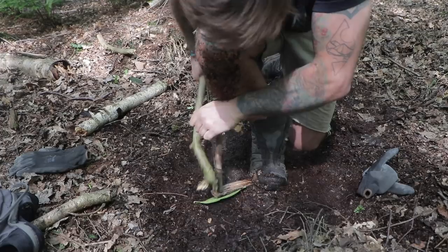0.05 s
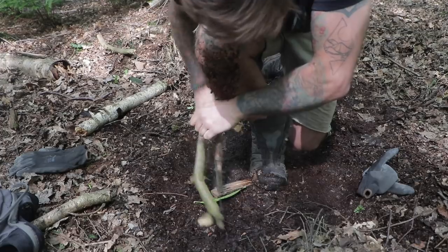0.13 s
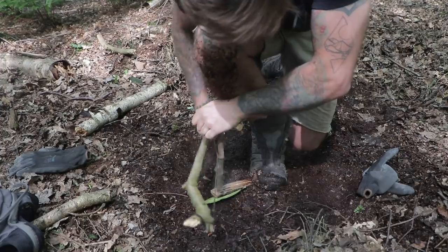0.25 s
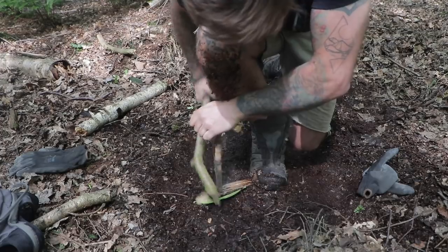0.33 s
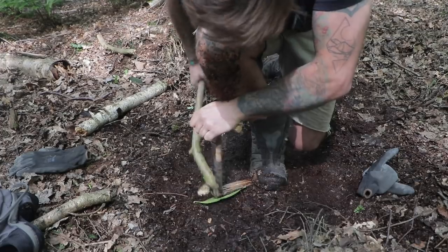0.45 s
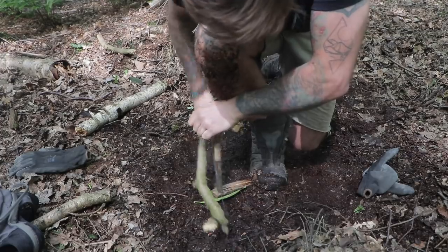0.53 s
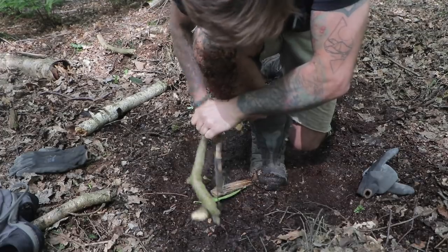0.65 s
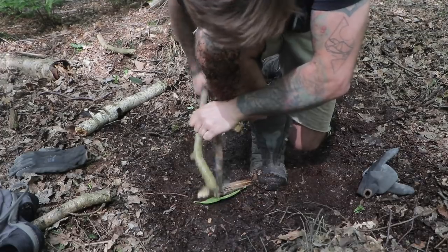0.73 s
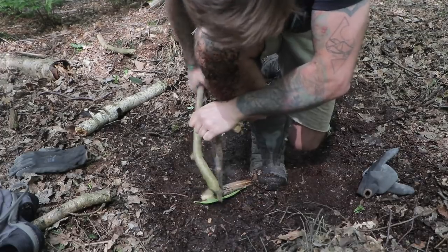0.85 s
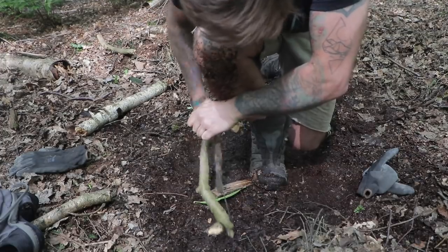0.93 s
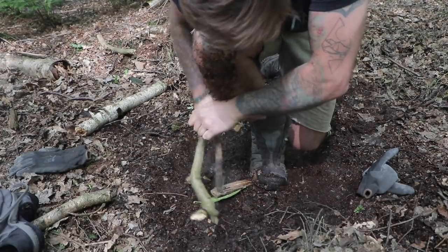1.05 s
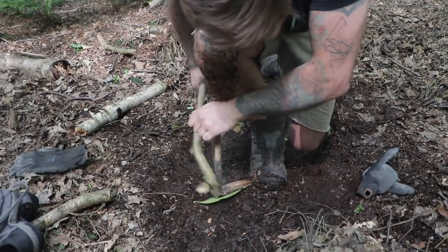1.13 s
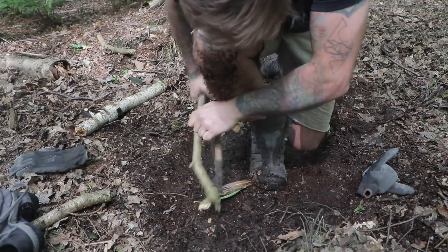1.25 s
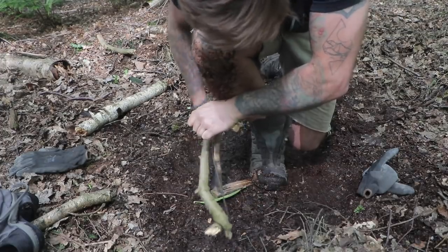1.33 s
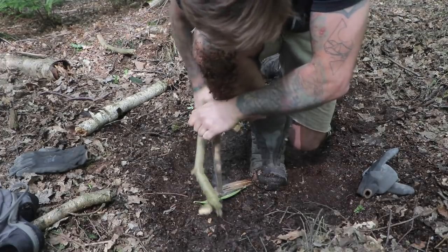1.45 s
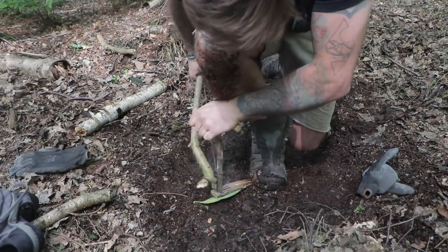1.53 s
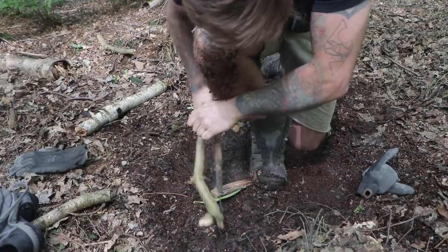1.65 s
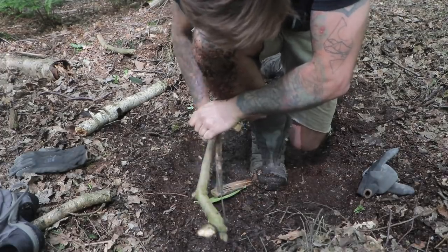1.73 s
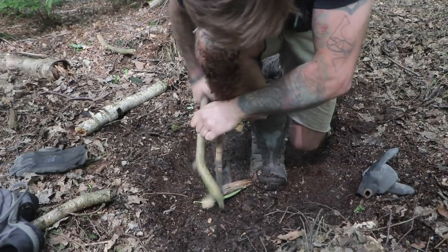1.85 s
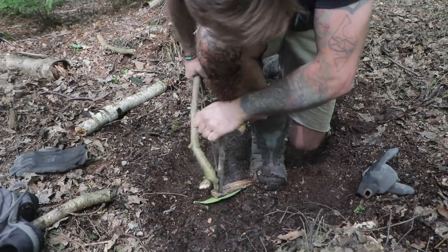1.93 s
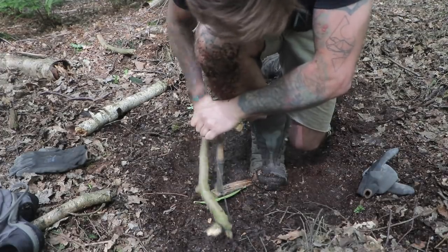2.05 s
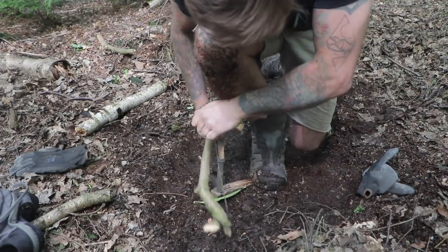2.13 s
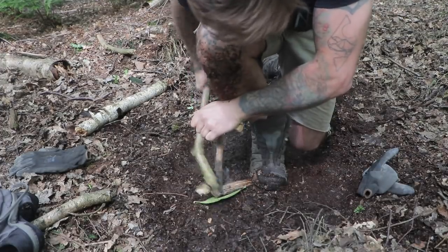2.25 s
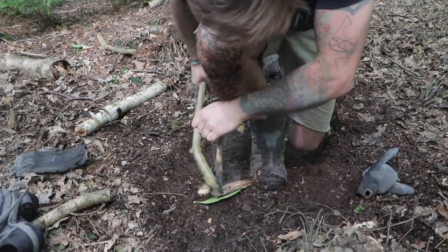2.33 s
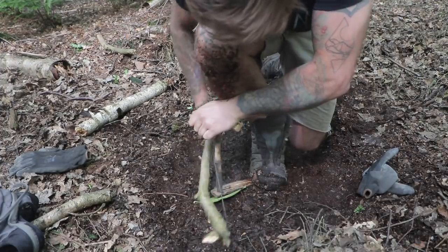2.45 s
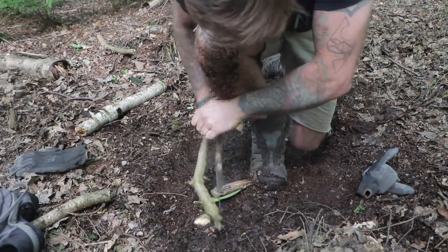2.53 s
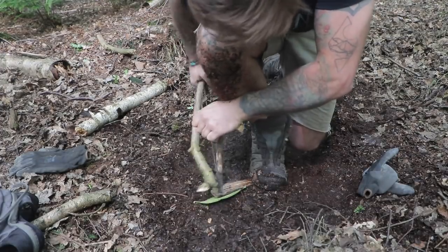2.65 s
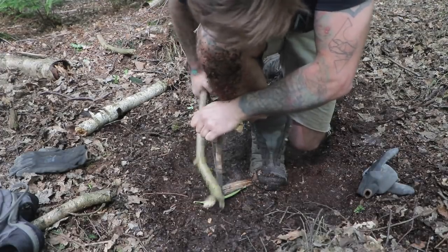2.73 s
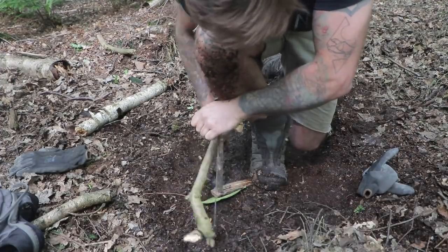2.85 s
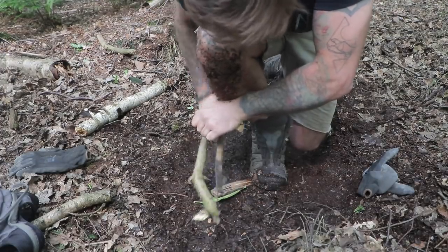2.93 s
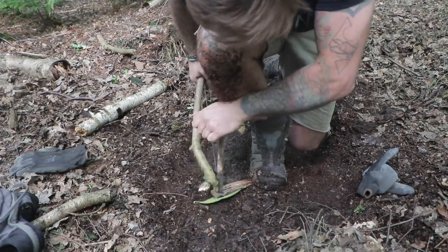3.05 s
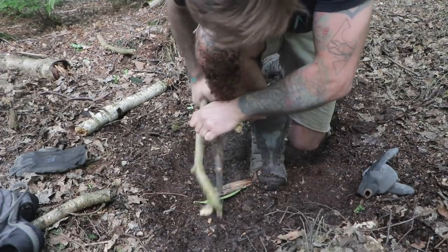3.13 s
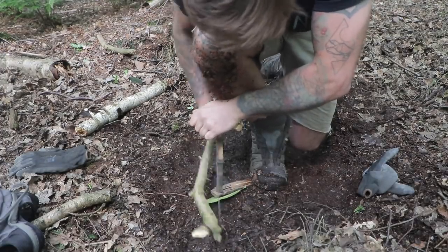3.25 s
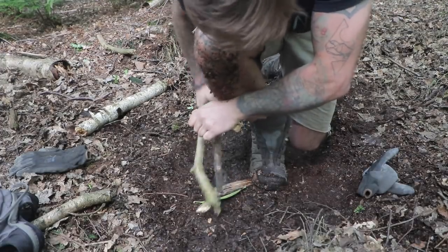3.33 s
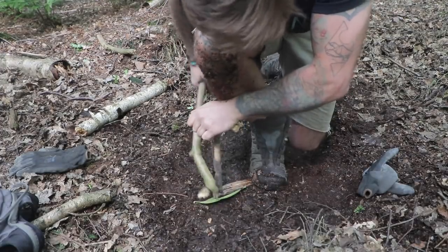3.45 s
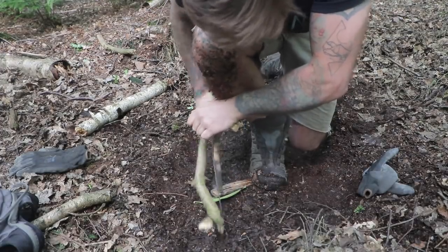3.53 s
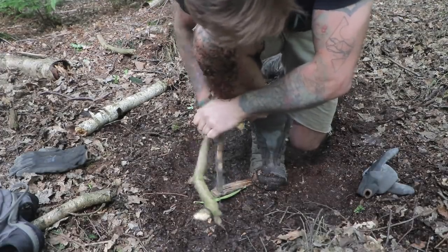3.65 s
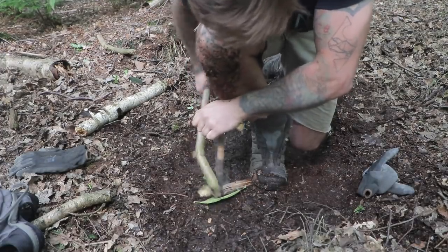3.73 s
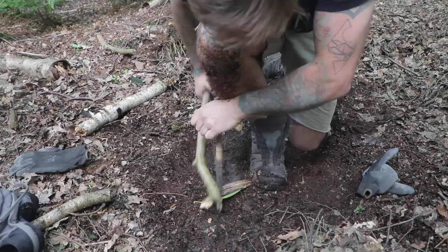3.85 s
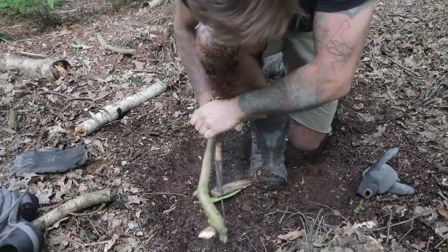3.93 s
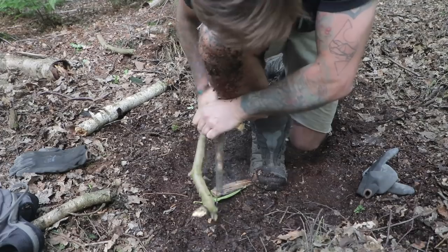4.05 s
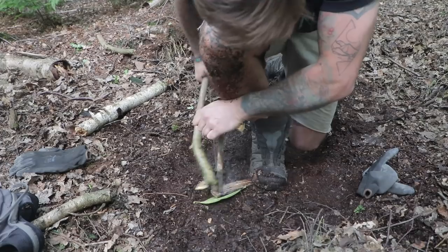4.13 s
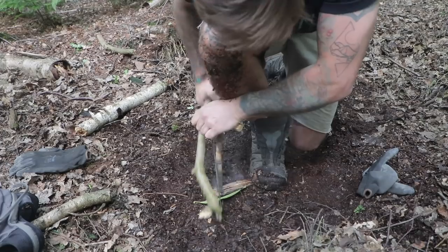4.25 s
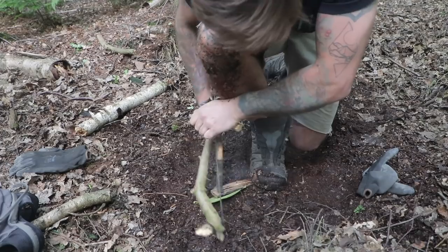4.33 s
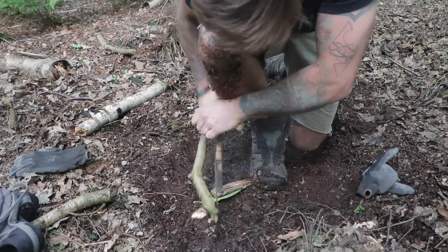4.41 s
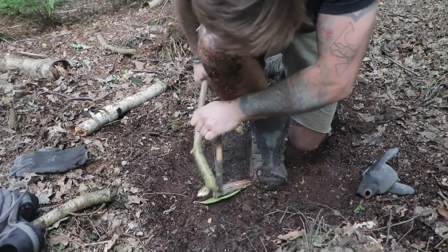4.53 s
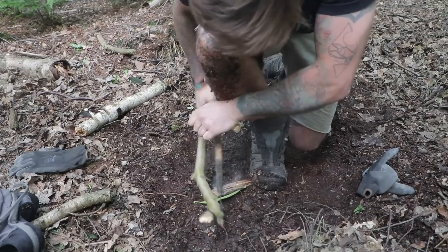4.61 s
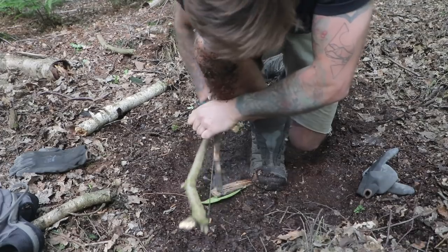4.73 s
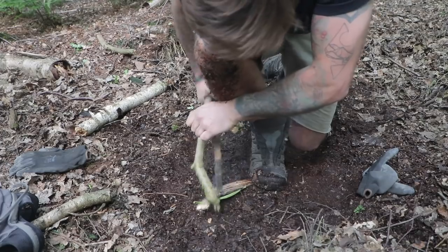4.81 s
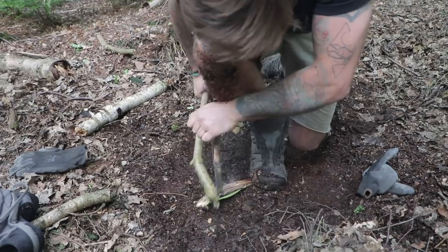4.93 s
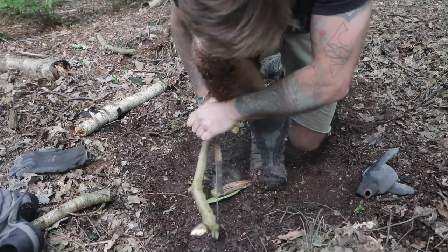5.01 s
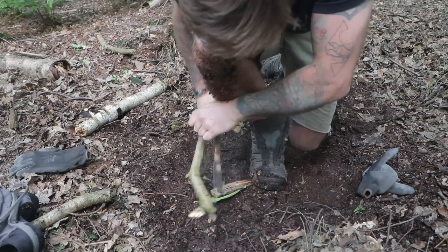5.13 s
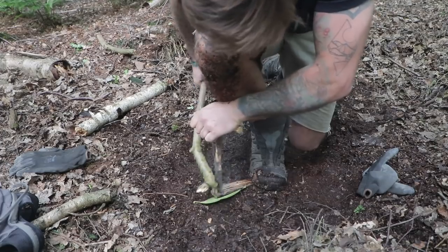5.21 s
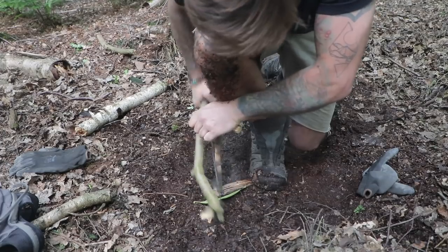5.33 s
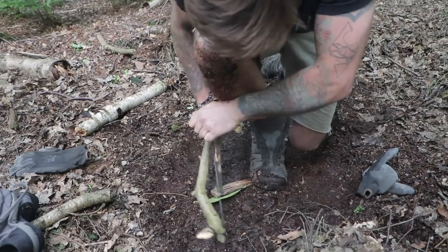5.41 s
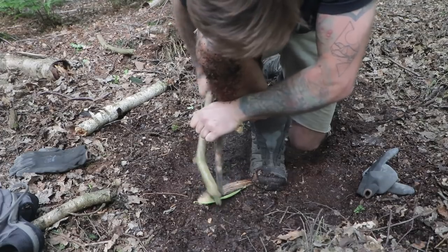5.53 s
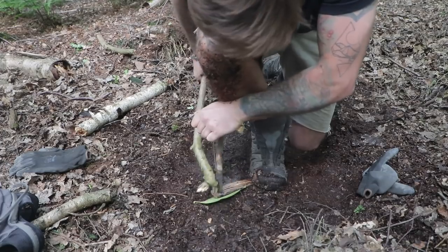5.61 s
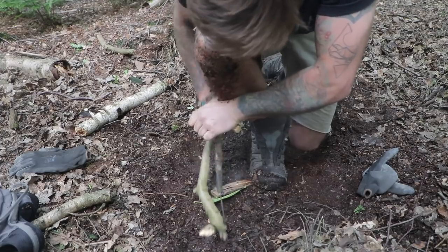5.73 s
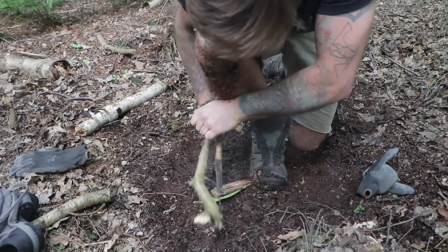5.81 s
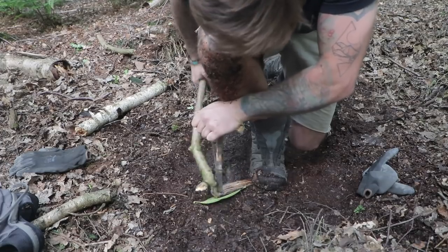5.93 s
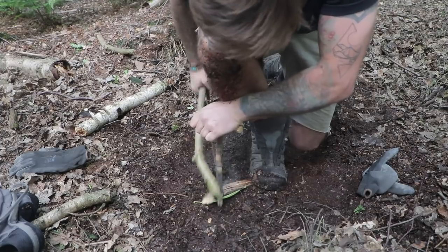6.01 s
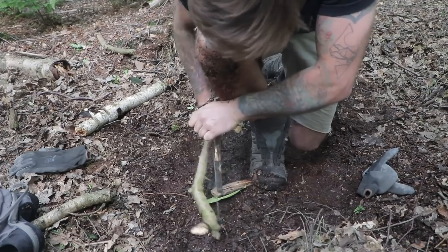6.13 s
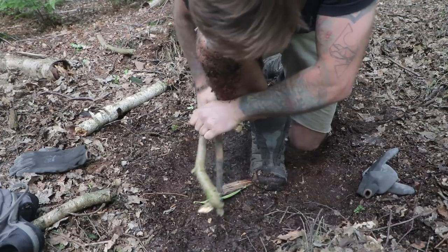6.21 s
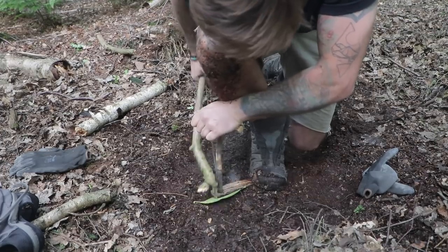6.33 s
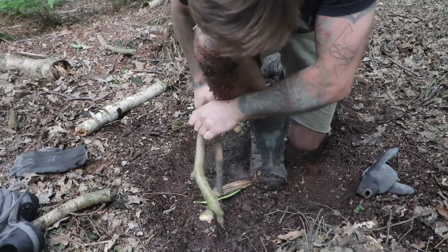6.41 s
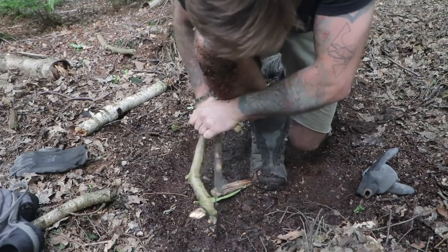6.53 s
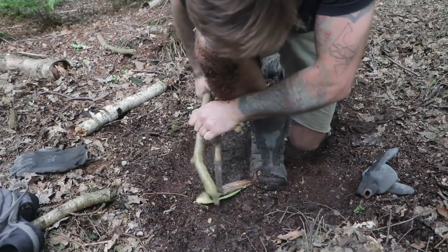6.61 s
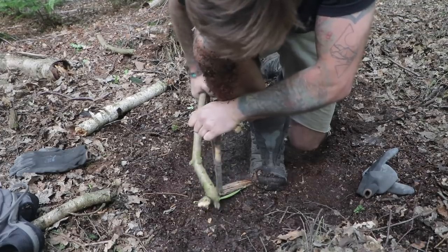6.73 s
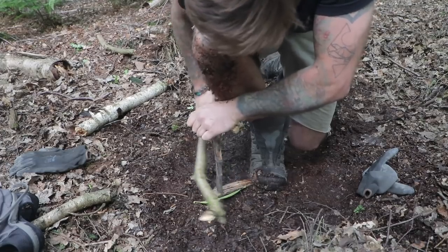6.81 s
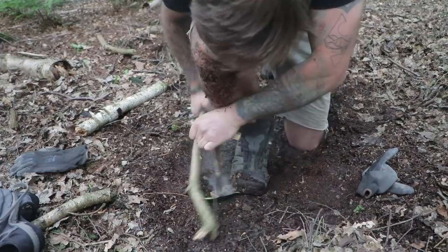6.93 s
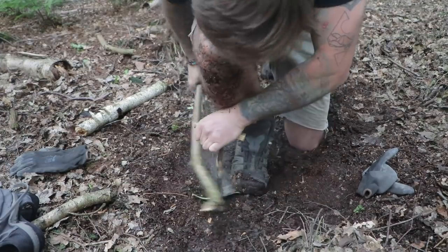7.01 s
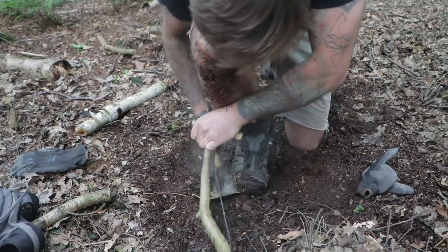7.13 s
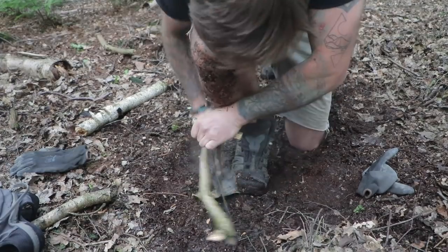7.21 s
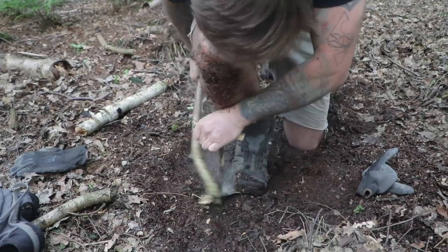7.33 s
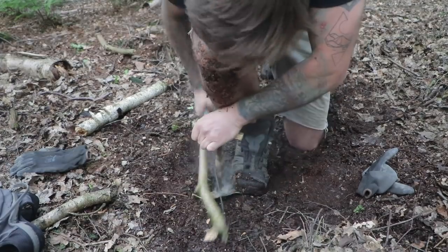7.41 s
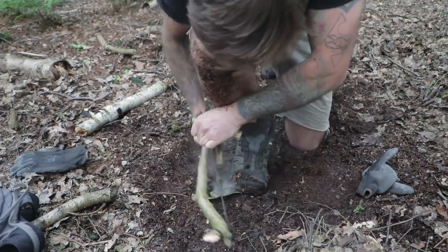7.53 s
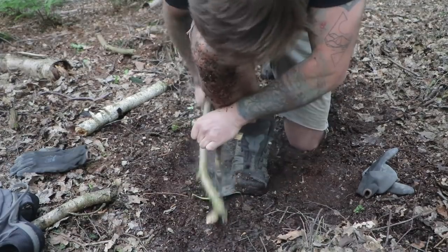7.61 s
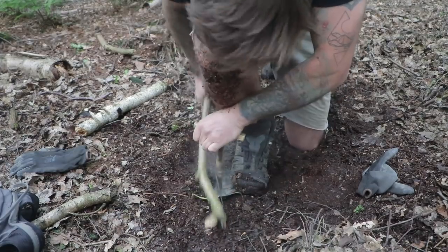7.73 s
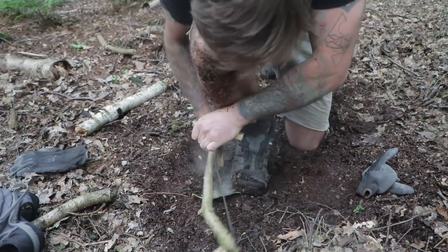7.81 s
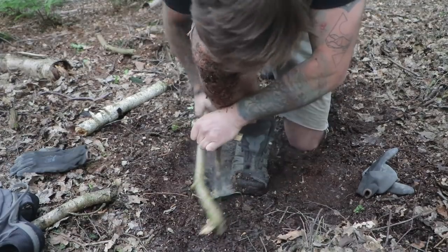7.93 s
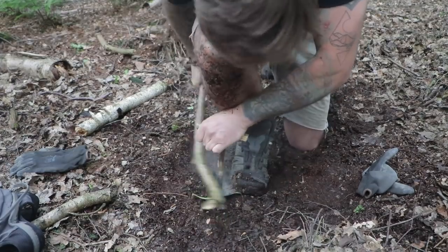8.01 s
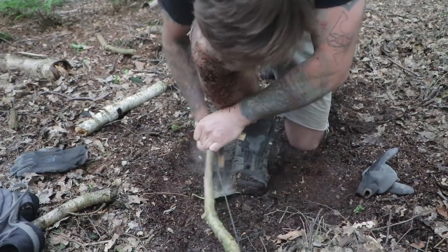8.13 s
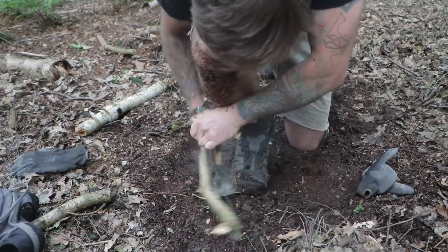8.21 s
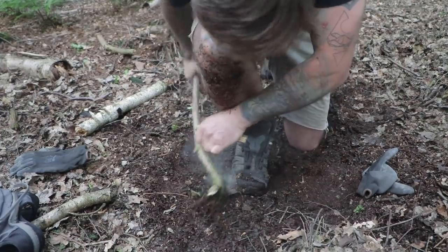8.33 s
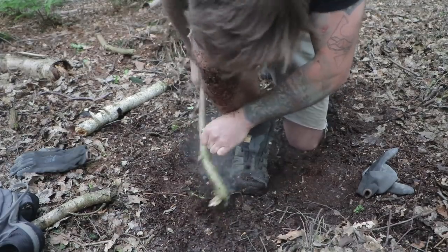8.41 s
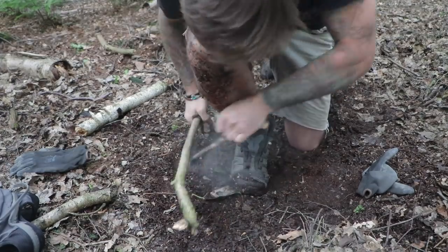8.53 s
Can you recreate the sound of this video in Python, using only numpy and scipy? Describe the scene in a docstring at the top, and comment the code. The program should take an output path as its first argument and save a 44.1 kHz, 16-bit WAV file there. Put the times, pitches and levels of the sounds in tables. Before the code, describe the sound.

Close up outdoors in woodland, a bow drill saws rapidly, five to six dry, gritty rubbing strokes a second, each with small high chirps and low wooden knocks. A faint cord note bends on the pushes. Distant birds whistle softly over low airy noise. Around seven seconds the rubbing grows louder and hollower, with sharp jolts and tiny squeaks, then the drill slips free in a short wooden clatter.

```python
"""On a forest floor a bow drill is worked: a wooden spindle rubs to and fro in its fireboard, five to six strokes a second.
Rubbing is friction noise through wood resonances; once a turn the tip catches, and about mid-stroke it chirps and knocks.
On each push the cord sings. As the socket wears, struck resonances jolt and short gliding tones squeak;
then the drill clatters loose in noisy impacts. Faint birds, gliding whistles with echoes, sing far off in airy noise."""
import sys
import numpy as np
from scipy import signal
from scipy.fft import rfft, irfft
from scipy.io import wavfile
from scipy.ndimage import uniform_filter1d

SR = 44100
rng = np.random.default_rng(int(sys.argv[2]) if len(sys.argv) > 2 else 0)


def file_out(sig):
    """Save sig as 16-bit WAV at sys.argv[1]."""
    # one column per channel
    cols = np.atleast_2d(sig).T
    # limit, then scale
    lim = np.clip(cols, -1, 1)
    pcm = np.round(lim * 32767).astype(np.int16)
    wavfile.write(sys.argv[1], SR, pcm)


N = 377784
TIME = np.arange(N) / SR
HZ = np.fft.rfftfreq(4096, 1 / SR)
# growing wear of the socket: (time [s], wear [0-1])
SOCKET_WEAR = [(0, 0), (6.3, 0), (7.1, 0.81), (8.3, 1)]
CATCH_LEAD_PULL, CATCH_LEAD_PUSH = 0.14, 0.26  # the tip catches this part of a turn before each knock


def amp(db):
    """Logarithmic level: decibels to an amplitude ratio."""
    return 10 ** (np.asarray(db) / 20)


def unit(x):
    """Normalization by mean power: scales to rms 1."""
    return x / np.sqrt(np.mean(x ** 2) + 1e-20)


def curve(points, hz=HZ):
    """Spectral envelope: gain through (frequency [Hz], level [dB]) points, joined on a log axis."""
    f, db = np.transpose(points)
    return amp(np.interp(np.log(hz + 1), np.log(f), db))


def humps(hz, width, db):
    """Modal superposition: gain of a set of resonances, their powers summed."""
    detune = (HZ[:, None] - hz) / width
    power = amp(db) ** 2 / (1 + detune ** 2) ** 4
    return np.sqrt(power.sum(1))


def ring(gain):
    """Minimum phase: the causal impulse response, of energy 1, whose spectrum has the shape of the gain."""
    log_gain = np.log(np.maximum(gain / gain.max(), 1e-5))
    circle = np.concatenate([log_gain, log_gain[-2:0:-1]])
    # the Hilbert transform of the log gain gives the phase
    response = np.fft.ifft(np.exp(np.conj(signal.hilbert(circle)))).real
    return response / np.linalg.norm(response)


def resonate(x, hz, width):
    """Heterodyning: shifts a low-pass of energy 1 up to the pitch curve hz, as a moving resonance."""
    t = TIME[:4096]
    swell = t ** 3 * np.exp(-2 * np.pi * width * t)
    turn = np.exp(2j * np.pi * np.cumsum(hz) / SR)
    filtered = signal.oaconvolve(x * turn.conj(), swell / np.linalg.norm(swell))[:N]
    return np.sqrt(2) * (turn * filtered).real


def wander(rate_hz):
    """Random fluctuation: low-passed noise of rms 1, mostly slower than the rate."""
    f = np.fft.rfftfreq(N, 1 / SR)
    spectrum = rfft(rng.standard_normal(N)) / (1 + (f / rate_hz) ** 4)
    return unit(irfft(spectrum, N))


def add(mix, s, sound):
    """Linear superposition: mixes a sound in at time s [s]; one before the start is left out."""
    at = round(s * SR)
    if at >= 0:
        part = mix[at:at + len(sound)]
        part += sound[:len(part)]


def blow(body, decay, rough, clump_db=4.0):
    """Impact excitation: a push and a clumpy crunch of fibres ring a body; energy as of 3 ms at level 1."""
    t = TIME[:2048]
    clumps = np.repeat(amp(clump_db * rng.standard_normal(size=64)), len(t) // 64)
    crunch = rng.standard_normal(len(t)) * clumps * np.exp(-t / decay)
    force = rough * crunch / np.linalg.norm(crunch)
    force[0] += max(1 - rough, 0)
    sound = signal.fftconvolve(force, body)
    return sound / np.linalg.norm(sound) * np.sqrt(0.003 * SR)


def squeak(length, start_hz, top_hz, jitter=0.038, overtone_db=-17):
    """Stick-slip oscillation: a brief tone whose pitch goes from start to top, then sags a little back."""
    along = np.arange(0, 1, 1 / (length * SR))
    shake = unit(uniform_filter1d(rng.standard_normal(1024), size=30))[:len(along)]
    hz = (start_hz + (top_hz - start_hz) * np.sin(2 * along)) * (1 + jitter * shake)
    phase = 2 * np.pi * np.cumsum(hz) / SR
    overtones = amp(overtone_db) * (np.sin(2 * phase) + np.sin(3 * phase))
    return 2 * np.sin(np.pi * along) * (np.sin(phase) + overtones)


def scatter(x, t60):
    """Diffuse scattering: dense, exponentially fading echoes from ground, trunks and leaves."""
    tail = rng.standard_normal(SR) * amp(-60 * TIME[:SR] / t60)
    return signal.oaconvolve(x, tail / np.linalg.norm(tail))[:N]


def strokes():
    """Reciprocating motion, pull first: start [s], length [s], rubbing [dB], firmest knock [s], turn [s]."""
    # an even beat that quickens in stages: (start [s], pull-and-push cycles [count], pulling share of a cycle [0-1])
    pace = [(-.102, 3, .46), (1.057, 6, .48), (3.301, 3, 0.47), (4.412, 4, 0.48), (5.846, 3, .5),
            (6.905, 4, 0.49)]
    # the hand bears down steadily, eases, then leans in for the finish: (time [s], rubbing level [dB])
    pressure = [(0, -43.5), (.2, -45), (.8, -45), (1.6, -46), (3.7, -45.5), (4.7, -46.5), (6.1, -47),
                (6.48, -45.5), (6.8, -50.5), (6.97, -43.5), (7.8, -42.5), (8.16, -43.5), (8.29, -51.5)]
    last_pull, bow_stops = 8.239, 8.35  # a last feeble pull starts and ends [s]
    pull_turns, push_turns = 8.2, 7.7  # spindle turns in a stroke
    pull_knock_at, push_knock_at = 0.24, 0.79  # place of each stroke's firmest knock in its cycle [0-1]

    changes, counts, shares = np.transpose(pace)
    done = np.cumsum([0, *np.round(counts).astype(int)])
    beats = np.interp(np.arange(done[-1] + 1), done, [*changes, last_pull])
    beats = np.append(beats, bow_stops)
    cycle, push = np.divmod(np.arange(2 * done[-1] + 1), 2)
    period = np.diff(beats)[cycle]
    stage = np.searchsorted(done[:-1], cycle, "right") - 1
    start = beats[cycle] + push * period * shares[stage]
    length = np.diff(start, append=bow_stops)
    level_db = np.interp(start + length / 2, *np.transpose(pressure))
    knock_s = beats[cycle] + period * np.where(push, push_knock_at, pull_knock_at)
    turn_s = length / np.where(push, push_turns, pull_turns)
    return start, length, level_db, knock_s, turn_s


def bow():
    """Phase of the motion: for every moment, the stroke under way and how far along it is [0-1]."""
    start, length, *_ = strokes()
    stroke = np.maximum(np.searchsorted(start, TIME) - 1, 0)
    return stroke, np.clip((TIME - start[stroke]) / length[stroke], 0, 1)


def air(level_db=-56.5, swell_db=1.0):
    """Shaped broadband noise: low rumble and soft hiss of the open wood, slowly swelling."""
    # spectrum of the air: (frequency [Hz], relative density [dB])
    air_spectrum = [(15, -5.5), (29, 4), (50, -11.5), (80, -11.5), (150, -22), (280, -31.5), (450, -27),
                    (560, -26), (700, -28), (2000, -34), (8500, -39), (9600, -44), (16000, -41.5)]
    gain = curve(air_spectrum, np.fft.rfftfreq(N, 1 / SR))
    noise = irfft(rfft(rng.standard_normal(N)) * gain, N)
    return amp(level_db + swell_db * wander(2.3)) * unit(noise)


def rubbing(stroke, along, speed_power=1.22, flicker_db=1.2, grit_db=2.5, fleck_db=2.5, seat_vary_db=1.34,
            seat_shift=0.018, hiss_db=-10.0, hiss_catch_db=5.0, push_catch=0.67, pull_shift=0.97):
    """Friction excitation: gritty noise swells with bow speed, catches once a turn and rings the wood."""
    # resonances of board and spindle: (frequency on the push [Hz], width [Hz], relative level pulling [dB],
    # pushing [dB], gain in a fully worn socket on the push, half that on the pull [dB], gain at a full catch [dB])
    wood_modes = [(84, 20, -12, -14.5, 0, 0), (215, 150, -27, -19.5, 9, 4), (540, 270, -26.5, -26, 9, -1),
                  (1250, 240, -15.5, -16, 6, 2.5), (2080, 410, -19, -18.5, 5, 1),
                  (2635, 380, -18, -17, 1.5, 3.5), (3785, 680, -12, -13.5, -1, 6.5),
                  (5597, 650, -10.5, -10.5, -0.5, 5), (8090, 880, -9.5, -8.5, -7, 3),
                  (13150, 770, -23.5, -27.5, 1, 3)]
    # broad hiss under those resonances: (frequency [Hz], relative level [dB])
    hiss_spectrum = [(60, -22.5), (300, -12), (520, -15), (780, -17.5), (2000, -14), (4700, -7),
                     (6600, -11), (8700, -9), (9600, -17), (12000, -16.5), (16000, -27.5)]
    catch_width = 0.16  # the tip drags for about this part of a turn to either side

    _, _, level_db, knock_s, turn_s = strokes()
    wear, push = np.interp(TIME, *np.transpose(SOCKET_WEAR)), stroke % 2
    turns = (TIME - knock_s[stroke]) / turn_s[stroke] + np.where(push, CATCH_LEAD_PUSH, CATCH_LEAD_PULL)
    speed = abs(np.sin(np.pi * along))
    catch = np.exp(-((turns - np.round(turns)) / catch_width) ** 2) * speed * np.where(push, push_catch, 1)
    grit = unit(amp(grit_db * wander(3100)))
    force = speed ** speed_power * amp(level_db[stroke] + flicker_db * wander(98)) * grit
    # a worn, polished socket hisses less, while most resonances ring more
    hiss = force * amp(hiss_db + hiss_catch_db * catch - 2 * wear) * rng.standard_normal(N)
    out = signal.oaconvolve(hiss, ring(curve(hiss_spectrum)))[:N]
    for hz, width, pull_db, push_db, worn_db, catch_db in wood_modes:
        # the tip seats differently at every reversal, which changes each resonance's strength and pitch
        louder, higher = rng.standard_normal((len(level_db), 2))[stroke].T
        db = np.where(push, push_db, pull_db) + seat_vary_db * louder
        db = db + worn_db * wear * (1 + push) / 2 + catch_db * catch
        # fibres hold and let go, feeding each resonance in its own short spurts
        spurts = unit(rng.standard_normal(N) * amp(fleck_db * wander(87)))
        # the spindle leans the other way on the pull, which lowers its resonances
        pitch = hz * np.where(push, 1, pull_shift) * (1 + seat_shift * higher)
        out += resonate(force * amp(db) * spurts, pitch, width)
    return out


def chirping(hz=5450, spread=0.032, length=0.0055, pull_db=-4.5, push_db=-8, taper_db=2.0, vary_db=2.0):
    """Stick-slip: where the tip catches around each stroke's firmest knock, it gives tiny high squeaks."""
    out = np.zeros(N)
    for k, (_, _, level_db, s, turn_s) in enumerate(zip(*strokes())):
        lead, side_db = (CATCH_LEAD_PUSH, push_db) if k % 2 else (CATCH_LEAD_PULL, pull_db)
        for turn in range(-1, 3 - k % 2):
            louder, higher = rng.standard_normal(2)
            db = level_db + side_db - taper_db * (turn - 0.5) ** 2 + vary_db * louder
            pitch = hz * (1 + spread * higher)
            chirp = squeak(length, pitch, pitch, jitter=0.029, overtone_db=-40)
            add(out, s + (turn - lead) * turn_s - length / 2, amp(db) * chirp)
    return out


def knocking(pull_db=0.0, push_db=0.1, before_db=-5, after_db=-8, taper_db=1.8, brighten=0.85, rise=0.072,
             worn_rise=0.38, vary_db=1.0):
    """Struck modes: the out-of-round spindle knocks a turn apart, an even run on the push, one firm on the pull."""
    # ringing of a knock before brightening and stiffening:
    # (frequency [Hz], width [Hz], relative level pulling [dB], pushing [dB])
    knock_modes = [(86, 26, 6.5, 8), (175.7, 94, -3.5, 7.5), (306, 96, -2, -1.5), (475, 130, -4, -6),
                   (608, 92, -3.5, -17), (1364, 385, 0, -10.5), (2000, 240, -7, -15), (3110, 350, -6, -26)]
    # pulls on which the spindle knocks hard against the socket wall: (time [s], level [dB])
    hard_knocks = [(.763, -39.5), (1.513, -42), (3.758, -36), (4.129, -39), (4.497, -40), (5.214, -40),
                   (5.567, -36.5), (5.932, -37.5), (6.283, -37.5)]
    # how far the spindle runs out of true: (time [s], knock level over the rubbing level [dB])
    wobble_db = [(0, 2), (1.8, 2.8), (2.6, -2.5), (3.8, 2), (5.2, -3), (5.8, 1.5), (6.5, 1), (6.82, -9.5),
                 (7.1, -3)]

    hz, width, pulling, pushing = np.transpose(knock_modes)
    high = hz > 900
    out = np.zeros(N)
    for k, (start, length, level_db, s, turn_s) in enumerate(zip(*strokes())):
        push, wear = k % 2, np.interp(s, *np.transpose(SOCKET_WEAR))
        usual_db = level_db + np.interp(s, *np.transpose(wobble_db)) + (push_db if push else pull_db)
        firm_db = usual_db
        for hard_s, hard_db in hard_knocks:
            if start < hard_s < start + length:
                s, firm_db = hard_s, hard_db
        for turn in range(-1 - push, 2):
            db = firm_db
            if turn:
                lesser_db = -taper_db * turn ** 2 if push else before_db if turn < 0 else after_db
                db = (usual_db + firm_db) / 2 + lesser_db + vary_db * rng.standard_normal()
            # harder knocks are brighter
            mode_db = (pushing if push else pulling) + brighten * (db + 36) * high
            # the low modes rise as the push loads the board and as the socket deepens
            stiffen = 1 + push * (rise * turn + worn_rise * wear) * ~high
            body = ring(humps(hz * stiffen, width, mode_db) + amp(-36.0))
            add(out, s + turn * turn_s, amp(db) * blow(body, decay=0.0018, rough=0.39))
    return out


def birds(waver=0.009, flutter_db=2.0, t60=1.0, direct=0.98, echo=0.6):
    """Frequency modulation: thin wavering, gliding whistles, smeared by echoes from the trees."""
    # far birds: (time [s], length [s], relative level [dB], nominal start pitch [Hz], nominal end pitch [Hz])
    bird_notes = [(.04, 0.23, -55.5, 5920, 5900), (.75, 0.06, -50, 7380, 7250),
                  (.878, .03, -50, 8100, 8160), (1.018, 0.034, -52, 8400, 8270),
                  (1.07, .035, -54.5, 8520, 8440), (1.1, .04, -50.5, 7290, 7120),
                  (1.31, 0.074, -50, 8130, 7970), (1.56, 0.1, -62, 3110, 3090), (1.73, .1, -61, 3070, 3030),
                  (2.275, 0.16, -60, 1840, 1890), (2.625, 0.125, -53, 2190, 2170),
                  (2.865, 0.12, -59, 1790, 1720), (3.28, .07, -66, 6200, 6300),
                  (4.342, 0.093, -61, 6250, 6380), (7.70, 0.091, -60, 555, 540)]
    song, wobble = np.zeros(N), 1 + waver * wander(72)
    for s, length, db, start_hz, end_hz in bird_notes:
        size = round(length * SR)
        hz = np.linspace(start_hz, end_hz, size) * wobble[round(s * SR):][:size]
        whistle = np.sin(2 * np.pi * np.cumsum(hz) / SR)
        add(song, s, amp(db) * signal.windows.hann(size) ** 0.5 * whistle)
    song *= amp(flutter_db * wander(11))
    return direct * song + echo * scatter(song, t60)


def jolts(ring_width_hz=300, ring_db=2):
    """Impact and stick-slip: the spindle catches, jumps and squeaks against the socket wall."""
    # the spindle jumps in its socket: (time [s], level [dB], main ring [Hz])
    jumps = [(.0450, -40.5, 1150), (6.9881, -30.5, 1050), (7.3147, -29, 1000), (7.3341, -36, 1290),
             (7.5587, -42.5, 650), (7.6550, -28.5, 820), (7.662, -31, 1050), (7.9895, -28.5, 1500),
             (8.0090, -32, 950), (8.4568, -34, 2390)]
    # what every jolt rings with besides: (frequency [Hz], width [Hz], relative level [dB])
    jolt_modes = [(230, 520, -4), (930, 400, 1), (1730, 680, 2), (5420, 440, -4)]
    # stick-slip tones: (time [s], length [s], relative level [dB], nominal starting pitch [Hz], nominal top pitch [Hz])
    slip_tones = [(3.79, 0.012, -47, 2150, 2200), (7.631, .007, -43, 2400, 2595),
                  (7.6645, 0.0089, -30.5, 1500, 1870), (7.669, .007, -38, 1460, 1520),
                  (7.9918, 0.0112, -35.5, 940, 1710), (7.998, 0.0097, -41, 1750, 1950)]
    out, body = np.zeros(N), humps(*np.transpose(jolt_modes)) + amp(-38)
    for s, db, hz in jumps:
        socket = ring(body + humps(hz, ring_width_hz, ring_db))
        add(out, s, amp(db) * blow(socket, decay=0.0027, rough=0.62))
    for s, length, db, start_hz, top_hz in slip_tones:
        add(out, s, amp(db - 2.0) * squeak(length, start_hz, top_hz))
    return out


def cord(stroke, along, slack_hz=200, taut_hz=635, tightest=0.77, spread=0.09):
    """Tension sets pitch: the cord tightens late in each push and sings a short arching note."""
    # loudness of the cord at its tightest: (time [s], peak level [dB])
    cord_db = [(0, -57), (1, -53.5), (2.5, -58), (4, -63.5), (8.3, -62)]
    hz = slack_hz + (taut_hz - slack_hz) * np.exp(-((along - tightest) / 0.23) ** 2)
    swell = np.exp(-((along - tightest) / spread) ** 2) * (stroke % 2)
    tone = np.sin(2 * np.pi * np.cumsum(hz * (1 + 0.0413 * wander(200))) / SR)
    return amp(np.interp(TIME, *np.transpose(cord_db))) * swell * tone


def clatter(ring_width_hz=520, ring_db=9):
    """Impact and free decay: bow and spindle scrape, tick, ring and bump the ground."""
    # sticks tick and scrape, mostly as the drill comes loose:
    # (time [s], level [dB], crunch decay [s], brightness [dB per octave], ring [Hz])
    stick_hits = [(.470, -51.5, .008, 3, 5930), (8.3270, -47, 0.0014, 5, 8000),
                  (8.3556, -40, 0.0097, -1.5, 1500), (8.3597, -36, 0.0057, 0.5, 2840),
                  (8.3790, -46, 0.0066, -5, 3700), (8.388, -43, 0.015, -3, 8200),
                  (8.4030, -40, 0.014, 1, 4400), (8.4070, -40.5, .003, -3, 2100),
                  (8.4126, -37, 0.0011, 3, 3740), (8.4400, -44, 0.0099, -2, 6900),
                  (8.4578, -37, 0.0053, -3, 2600), (8.5308, -47, 0.005, -.5, 5100)]
    # spectrum of a struck stick: (frequency [Hz], relative level [dB])
    stick_spectrum = [(100, -15), (700, -1), (1900, -4.5), (3900, -4.5), (8300, -7), (10000, -14),
                      (13500, -11), (16000, -20)]
    # wood bumps the soil: (time [s], level [dB])
    thuds = [(8.3003, -36.5), (8.5470, -40)]
    # spectrum of the bumped soil: (frequency [Hz], relative level [dB])
    soil_spectrum = [(40, -0.5), (500, 0), (1400, -8.5), (2600, -22.5), (16000, -36)]
    # modes of the freed spindle: (frequency [Hz], starting level [dB], time to fall by 60 dB [s])
    spindle_modes = [(1096, -36, 0.088), (2260, -35, 0.026), (2820, -34, 0.025), (7600, -38.5, 0.03)]
    freed_at = 8.4577  # the freed spindle is struck and rings [s]

    out, soil = np.zeros(N), ring(curve(soil_spectrum))
    for s, db, decay, bright_db, hz in stick_hits:
        tilt = amp(bright_db * np.log2(1 + HZ / 1000))
        stick = ring(curve(stick_spectrum) * tilt * (1 + humps(hz, ring_width_hz, ring_db)))
        add(out, s, amp(db) * blow(stick, decay, rough=1.0))
    for s, db in thuds:
        add(out, s, amp(db) * blow(soil, decay=0.0023, rough=0.46))
    t = TIME[:8000]
    for hz, db, t60 in spindle_modes:
        add(out, freed_at, amp(db - 60 * t / t60) * np.sin(2 * np.pi * hz * t))
    return out


def scene(echo_db=-22, t60=0.28):
    """Superposition: the drill close by, with a weak echo, over birds and air."""
    stroke, along = bow()
    drill = rubbing(stroke, along) + chirping() + knocking()
    drill += jolts() + cord(stroke, along) + clatter()
    echo = amp(echo_db) * scatter(drill, t60)
    return (air() + drill + echo + birds())[None]


def record(dry):
    """Band limiting: a linear-phase low-pass ends the spectrum near 15.85 kHz."""
    lowpass = signal.firwin(511, 15850, window=("kaiser", 9), fs=SR)
    return signal.oaconvolve(dry, lowpass[None], "same")


dry = scene()
out = record(dry)
file_out(out)
```